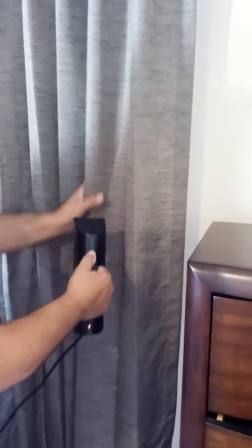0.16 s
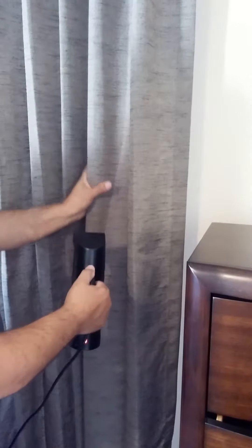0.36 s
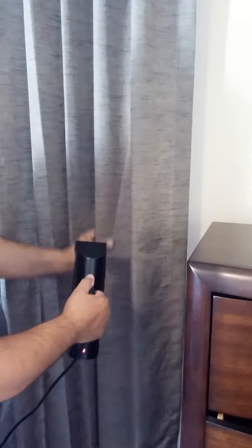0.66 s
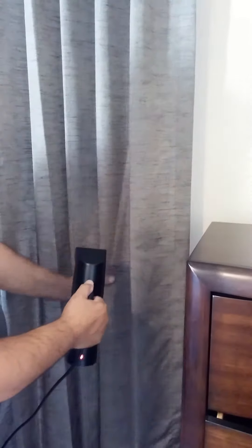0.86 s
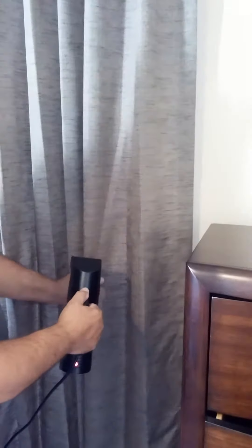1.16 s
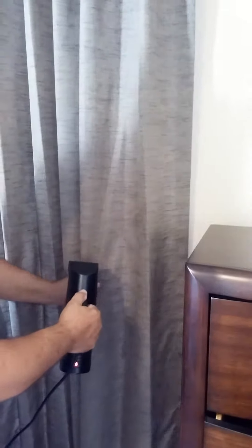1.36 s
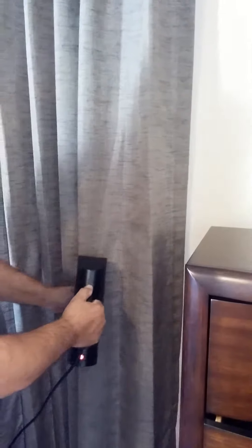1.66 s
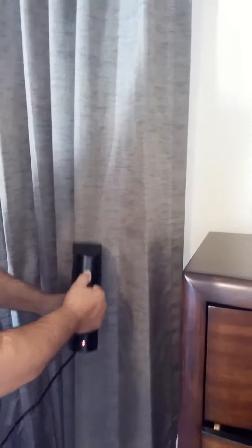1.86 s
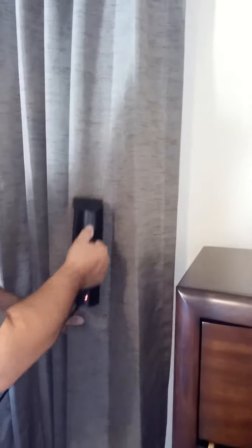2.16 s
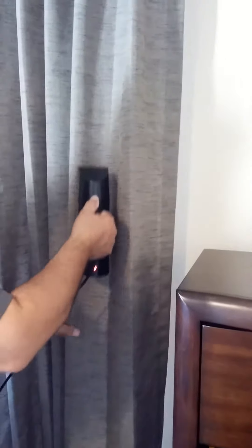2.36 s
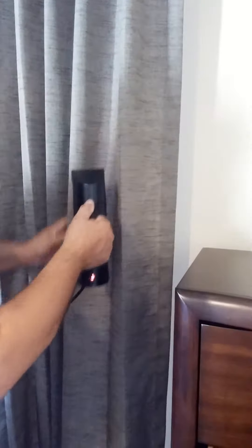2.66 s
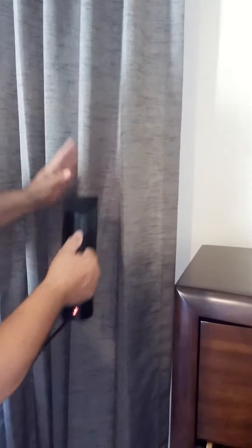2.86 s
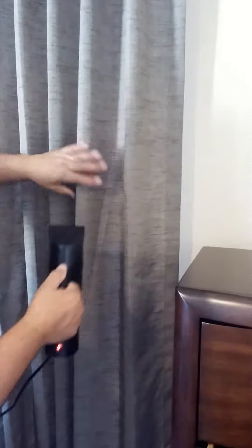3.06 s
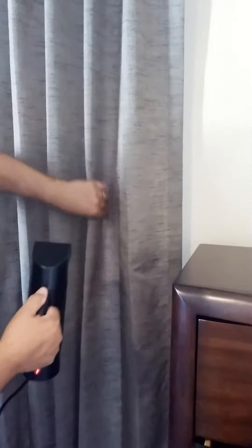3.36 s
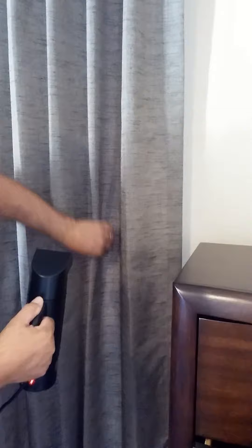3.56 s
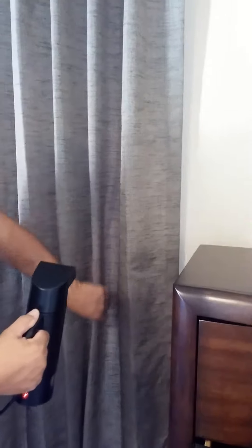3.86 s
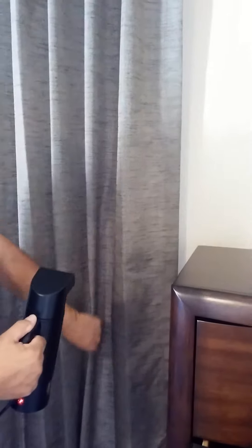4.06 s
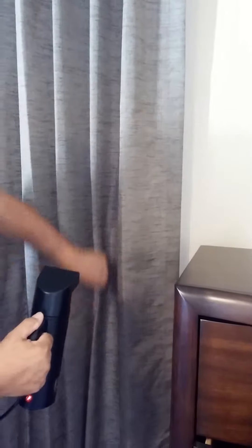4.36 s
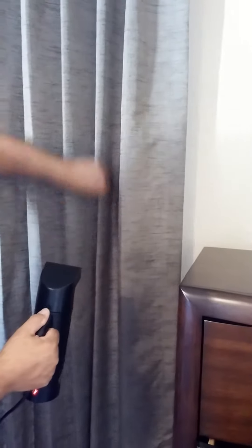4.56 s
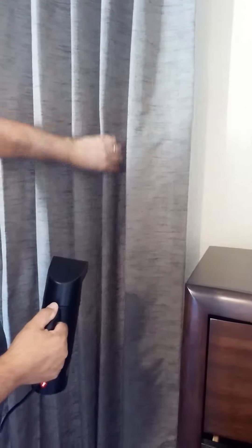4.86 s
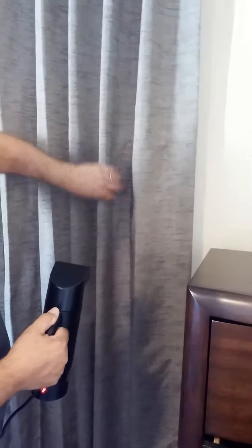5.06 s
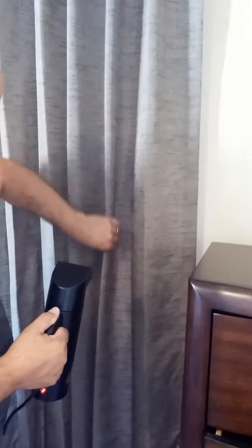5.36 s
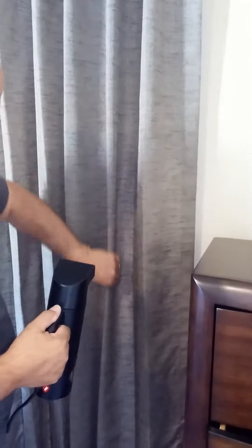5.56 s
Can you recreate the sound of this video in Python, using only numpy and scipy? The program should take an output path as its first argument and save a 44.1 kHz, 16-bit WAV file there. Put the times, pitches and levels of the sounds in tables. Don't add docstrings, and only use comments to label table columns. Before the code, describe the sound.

Uneven steam hiss spits and chokes with low watery glugs and small hollow knocks, fades to weak puffs, then surges back fuller.

```python
import sys
import numpy as np
from scipy import signal
from scipy.fft import rfft, irfft, next_fast_len
from scipy.io import wavfile
from scipy.ndimage import uniform_filter1d

SR = 44100
rng = np.random.default_rng(int(sys.argv[2]) if len(sys.argv) > 2 else 0)


def magnitude_from_level(level_db):
    exponent = np.asarray(level_db, float) / 20
    return 10 ** exponent


def master_out(mix):
    frames = np.transpose(np.atleast_2d(mix))
    ceiling = np.clip(frames, -1, 1)
    pcm = np.round(ceiling * 32767).astype(np.int16)
    wavfile.write(sys.argv[1], SR, pcm)


N = 251370

# (frequency [Hz], density [dB per Hz])
FLOOR_SPECTRUM = [(24, -16), (40, 2), (89, -28), (126, -25), (197, 10), (859, -74), (6160, -71),
                  (9410, -59), (15500, -30)]
# (frequency [Hz], correlation [-1..1])
PORT_LIKENESS = [(40, 0.94), (130, 1), (290, 0.73), (640, 0.49), (1410, 0.077), (3100, 0.2), (6800, 0.016),
                 (15000, 0.018)]
# (frequency [Hz], width [Hz], level [dB])
ROD_MODES = [(113, 15, 3), (239, 25.3, -3), (368, 25.4, -1), (449, 16, 1.5), (524, 20, -1),
             (701, 52.7, 5.5), (927, 25.3, 5)]
# (start [s], length [s], level [dB])
STROKES = [
    (.1, 1, -81.5),
    (3.42, 0.12, -66),
    (5.31, 0.305, -56.5),
]
# (frequency [Hz], density [dB per Hz])
RUMBLE_SPECTRUM = [(25, -19), (50, 11), (95, -5), (120, -0.5), (150, 6.5), (178, 4), (215, -6), (250, -1),
                   (320, -10.5), (450, -13), (600, -15), (900, -21.5), (1500, -41.5)]
# (start [s], length [s], rumble level [dB])
BOILS = [(.054, .1, -49), (.45, 0.2, -66), (.63, 0.061, -47), (.85, 0.026, -54.5), (.915, 0.15, -58.5),
         (1.13, 0.06, -58.5), (1.295, 0.056, -55), (1.49, 0.19, -63), (1.7, 0.085, -56), (1.96, 0.1, -58),
         (2.095, 0.14, -52), (2.27, 0.18, -58.5), (2.485, 0.077, -57.5), (2.6, 0.14, -55), (2.9, 0.07, -67),
         (3.05, 0.074, -54.5), (3.166, 0.029, -49), (3.305, 0.018, -56), (3.365, 0.044, -58.5),
         (3.47, 0.07, -55), (3.85, 0.064, -55), (3.93, 0.11, -49), (4.07, 0.14, -59.5), (4.335, 0.11, -58),
         (4.56, 0.081, -63), (4.65, 0.072, -52.5), (4.825, 0.082, -60), (5.06, 0.077, -53),
         (5.31, 0.069, -62), (5.485, 0.12, -52)]
# (time [s], peak [dB], frequency [Hz], length [s])
GLUGS = [(0.077, -40.5, 185, 0.024), (0.519, -57, 185, 0.037), (0.638, -47, 183, 0.03),
         (0.865, -44.5, 180, 0.02), (1.187, -47.5, 145, 0.019), (1.31, -40.5, 187, 0.027),
         (1.487, -50, 184, 0.024), (1.58, -52, 180, 0.028), (1.718, -50.5, 202.5, 0.043),
         (2.144, -46, 196, 0.043), (2.2, -53, 129, 0.027), (2.266, -51.5, 197, 0.02),
         (2.323, -47, 197, 0.02), (2.423, -52, 189, 0.027), (2.495, -45.5, 130, 0.022),
         (2.604, -42.5, 186.4, 0.025), (2.659, -43, 192, 0.017), (2.696, -38.5, 182, 0.021),
         (3.061, -39, 165.3, 0.029), (3.18, -42.5, 171.4, 0.031), (3.307, -47.5, 164, 0.017),
         (3.366, -51, 185, 0.018), (3.473, -45, 177, 0.033), (3.959, -43.5, 169, 0.027),
         (4.188, -49, 113, 0.039), (4.335, -50, 151, 0.026), (4.459, -50.5, 151.5, 0.042),
         (5.066, -42, 178, 0.031), (5.385, -51, 176, 0.042), (5.551, -45, 176.5, 0.025)]
# (time [s], peak [dB], frequency [Hz])
MORE_GLUGS = [(.667, -45, 186), (.693, -44, 179), (.95, -53, 120), (1.07, -59, 120), (.917, -55, 145),
              (1.131, -58, 159), (1.367, -51, 180), (1.974, -59, 186), (2.098, -55, 162), (2.361, -53, 113),
              (2.534, -48, 150), (2.94, -61, 131), (3.929, -59, 180), (4.009, -51, 150), (4.1, -43, 119),
              (4.602, -51, 175), (4.66, -55, 164), (4.828, -48, 178), (4.885, -52, 176), (5.136, -58, 172),
              (5.334, -58, 175), (5.516, -49, 174)]
# (time [s], peak [dB], frequency [Hz])
KNOCKS = [(0.291, -44, 1800), (0.471, -41.5, 1250), (0.528, -41.5, 1010), (0.683, -39, 680),
          (1.3, -50.5, 980), (1.477, -52, 1190), (2.154, -53, 790), (2.219, -68, 920), (2.348, -47.5, 980),
          (2.422, -39.5, 1200), (2.661, -49, 1224), (2.899, -44.5, 1250), (3.062, -39.5, 720),
          (3.181, -47, 717), (3.375, -40, 1000), (3.669, -39.5, 950), (3.83, -39.5, 1300),
          (4.27, -45.5, 975), (4.66, -39, 1250), (4.984, -39, 1020), (5.019, -41, 1030),
          (5.472, -36.5, 930), (5.518, -46, 830), (5.64, -41, 860), (5.687, -35, 1800)]
# (frequency [Hz], density [dB per Hz])
JET_SPECTRUM = [(250, -14), (500, -6), (1000, -2), (2000, 2), (3500, 1.5), (6000, -0.5), (9000, -4.5),
                (12000, 0), (14000, 3), (15800, 0.5)]
# (frequency [Hz], width [Hz], level [dB])
DUCT_MODES = [(715, 160, -0.5), (923.5, 117, 2), (1100, 81, 0.5), (1250, 80, -1), (1838, 180, -2.5),
              (576, 100, -35), (1680, 2200, -8)]
# (time [s], jet level [dB], duct ring over the jet [dB])
PRESSURE = [(0, -44.5, -6.5), (.3, -48.5, -10), (.96, -52.5, -4), (1.12, -58.5, -6), (1.5, -60, -5),
            (1.67, -52, -7), (1.9, -62, 2.5), (2.35, -65.5, -4), (2.42, -48, -15), (2.66, -72, -1),
            (2.91, -49.5, -5), (3.2, -58.5, -5.5), (3.36, -43.5, -6.5), (3.95, -43, -8), (4.2, -45, -4),
            (4.65, -39.5, -13), (5.05, -44, -5), (5.7, -42, -7.5)]
# (clears at [s], creep [s], depth [dB], clearing [s])
SLUGS = [(.09, .15, 14, 0.05), (.27, 0.031, 4, 0.022), (.44, 0.12, 12.5, 0.012),
         (0.632, 0.084, 5.5, 0.0051), (.745, 0.054, 8, .04), (0.788, 0.044, 5.5, 0.0078),
         (.945, 0.11, -0.5, .006), (1.098, 0.075, 13.5, 0.027), (1.215, .06, 13, 0.02),
         (1.3, 0.055, 4, 0.012), (1.467, .15, 16.5, 0.019), (1.783, 0.12, 14.5, 0.0062),
         (1.866, 0.079, 18, 0.019), (2.012, 0.029, 4, .008), (2.126, 0.055, 14, 0.01),
         (2.214, 0.028, 17, 0.0057), (2.305, 0.085, -2, 0.0067), (2.656, 0.24, 13.5, 0.0078),
         (2.75, 0.045, -3, 0.028), (3.057, 0.13, 4.5, 0.011), (3.158, 0.073, 10.5, .005),
         (3.218, .04, 2.5, 0.0052), (3.41, 0.042, 3, .04), (4.12, 0.11, 4.5, 0.11),
         (4.268, 0.085, 7.5, 0.012), (4.308, 0.097, 11.5, 0.052), (4.835, 0.047, 9.5, 0.043),
         (5.165, 0.16, 5.5, 0.056), (5.32, 0.038, 4.5, 0.065)]
# (time [s], peak [dB], duct share [dB], fade [s])
SPURTS = [(.1406, -69, -13, 0.035), (0.282, -53, -15, 0.055), (0.3773, -45, -35, 0.0081),
          (.4485, -65, 1.5, 0.12), (0.637, -46.5, -10.5, 0.038), (.7905, -46.5, -38, 0.047),
          (0.9485, -45, -20, 0.016), (1.2458, -52, -10.5, 0.029), (1.475, -81, 8, 0.043),
          (1.7915, -57.5, -15, 0.031), (2.017, -68, 0.5, 0.046), (2.1286, -80, -13, 0.023),
          (2.217, -62, 4, 0.03), (2.309, -52.5, -4.5, 0.026), (2.396, -57, -8, 0.044),
          (2.661, -59.5, -11, .025), (2.776, -54, -14, 0.039), (3.0628, -58, 7, 0.032),
          (3.1634, -64, 1, 0.036), (3.222, -52, -19, 0.026), (3.3084, -49, -25, 0.021),
          (4.272, -81, 12, 0.035)]
# (frequency [Hz], sharpness [Q], level [dB])
PORTS = [(9464, 11.2, 4.5), (8500, 5.7, -2)]
# (frequency [Hz], gain [dB])
FAR_PORT_SHADE = [(60, -3.5), (200, -0.5), (400, 2), (700, -4.5), (1300, 1.5), (5000, 0.5), (9000, -2),
                  (15000, -9.5)]


def evened(x):
    return x / np.sqrt(np.mean(x ** 2) + 1e-20)


def read(points, hz):
    f, value = np.transpose(points)
    return np.interp(np.log(hz + 1), np.log(f + 1), value)


def add(mix, start_s, sound):
    part = mix[..., round(start_s * SR):][..., :len(sound)]
    part += sound[:part.shape[-1]]


def curve(table):
    s, *columns = np.transpose(table)
    t = np.arange(N) / SR
    return [np.interp(t, s, column) for column in columns]


def swells(rows, rest_db, rise_s, fade_db_per_s):
    t, gain = np.arange(N) / SR, magnitude_from_level(rest_db)
    for start_s, length_s, db in rows:
        rise = np.clip((t - start_s) / rise_s + .5, 0, 1)
        past_end_s = np.maximum(t - start_s - length_s, 0)
        gain = gain + rise * magnitude_from_level(db - fade_db_per_s * past_end_s)
    return gain


def slow(hz):
    return evened(signal.lfilter(*signal.butter(2, hz, fs=SR), rng.standard_normal(N)))


def density(points):
    return lambda hz: magnitude_from_level(read(points, hz))


def modes(table):
    return lambda hz: np.sqrt(sum(magnitude_from_level(2 * db) / (1 + (2 * (hz - f) / w) ** 2) ** 2 for f, w, db in table))


def noise(colour, patchy_db):
    frames, hz = N // 256 + 5, np.fft.rfftfreq(1024, 1 / SR)
    a, b, c, d, patches = rng.standard_normal((frames, 513, 5)).T
    patches = uniform_filter1d(patches, size=10, axis=0)
    patches = evened(uniform_filter1d(patches, size=8, axis=1))
    same = np.clip(read(PORT_LIKENESS, hz), -1, 1)[:, None]
    left, other = a + 1j * b, c + 1j * d
    right = same * left + np.sqrt(1 - same ** 2) * other
    z = np.array([left, right]) * colour(hz)[:, None] * magnitude_from_level(patchy_db * patches)
    return evened(signal.istft(z, nperseg=1024, noverlap=768)[1][:, :N])


def floor():
    return magnitude_from_level(-82.5) * noise(density(FLOOR_SPECTRUM), patchy_db=-3.5)


def room(x):
    t = np.arange(SR // 4) / SR
    signs = rng.choice([-1., 1.], (2, len(t)))
    sparse = rng.random((2, len(t))) < .05
    decay = magnitude_from_level(-60 * t / 0.17) * (t > .004)
    taps = signs * sparse * decay
    taps = signal.lfilter(*signal.butter(1, 3500, fs=SR), taps / np.linalg.norm(taps[0]))
    return signal.fftconvolve(x, taps, axes=1)[:, :N]


def rod():
    rings = np.zeros(N)
    for f, width_hz, db in ROD_MODES:
        level = magnitude_from_level(db + 3.0 * slow(width_hz))
        hz = f + .6 * width_hz * slow(2 * width_hz)
        rings += level * np.sin(2 * np.pi * np.cumsum(hz) / SR)
    return evened(rings) * swells(STROKES, rest_db=-83.5, rise_s=0.02, fade_db_per_s=300)


def rumble():
    lumps_db = np.clip(3.1 * slow(26), -5, 3)
    lumpy = noise(density(RUMBLE_SPECTRUM), patchy_db=3.0) * magnitude_from_level(-5.5 + lumps_db)
    return lumpy * swells(BOILS, rest_db=-68.5, rise_s=0.012, fade_db_per_s=318)


def glugs():
    shared_length_s, upper_ratio, upper_db = 0.024, 1.4, -10.5
    out = np.zeros(N)
    for s, db, hz, length_s in GLUGS + [(*row, shared_length_s) for row in MORE_GLUGS]:
        start, bend = rng.random(2)
        u = np.arange(round(3 * length_s * SR)) / SR / length_s
        turns = hz * length_s * u * (1 + 0.031 * (bend - .5) * u) + start
        upper = magnitude_from_level(upper_db) * np.exp(-u) * np.sin(2 * np.pi * upper_ratio * turns)
        tone = np.sin(2 * np.pi * turns) + upper
        swell = 3.62 * u * np.exp(-(1.53 * u) ** 1.3)
        add(out, s - .008, magnitude_from_level(db - 4.5) * tone * swell)
    return out


def knocks():
    out, t = np.zeros((2, N)), np.arange(3000) / SR
    burst = np.hanning(900) ** .5 * np.exp(-np.arange(900) / 400.0)
    splash = 1.07 * np.exp(-t / 0.00081) * np.sin(2 * np.pi * 1400 * t)
    for s, db, hz in KNOCKS:
        tone = np.exp(-t / 0.0045) * np.sin(2 * np.pi * hz * t)
        shared = rng.standard_normal(900)
        for side in out:
            blows = (shared + 0.93 * rng.standard_normal(900)) * burst
            ring = signal.fftconvolve(blows, tone + splash)
            add(side, s - .002, magnitude_from_level(db - 4) * ring / abs(ring).max())
    return out


def choke_db():
    settled = 0.43
    total = np.zeros(N)
    for s, creep_s, depth_db, clearing_s in SLUGS:
        dip = [(s - creep_s, 0), (s - settled * creep_s, -depth_db), (s, -depth_db), (s + clearing_s, 0)]
        total += curve(dip)[0]
    return total


def spurts():
    t, hiss, ring = np.arange(SR // 4) / SR, np.zeros(N), np.zeros(N)
    for s, db, share_db, fade_s in SPURTS:
        spurt = (1 - np.exp(-t / 0.00053)) * np.exp(-t / fade_s)
        add(hiss, s, magnitude_from_level(db - 7.5) * spurt)
        add(ring, s, magnitude_from_level(db + share_db - 1) * spurt)
    return hiss, ring


def jet():
    jet_db, duct_db = curve(PRESSURE)
    choked_db = jet_db + choke_db()
    hiss_spurts, ring_spurts = spurts()
    hiss_gain = magnitude_from_level(choked_db - 5.5) + hiss_spurts
    ring_gain = magnitude_from_level(choked_db + duct_db - 4.5) + ring_spurts
    broad = noise(density(JET_SPECTRUM), patchy_db=1.1)
    body = signal.filtfilt(*signal.butter(2, 5500, fs=SR), broad)
    brighter = (hiss_gain / magnitude_from_level(-53.0)) ** 0.065
    hiss = hiss_gain * (body / brighter + (broad - body) * brighter)
    ring = ring_gain * noise(modes(DUCT_MODES), patchy_db=2.5)
    flutter = magnitude_from_level(0.78 * slow(29) + 1.0 * slow(250))
    return flutter * (hiss + ring)


def scene():
    steam = jet() + knocks()
    boiler = rumble() + glugs()
    return steam + magnitude_from_level(-9) * room(steam) + boiler + rod() + floor()


def roll_off(x):
    return signal.sosfilt(signal.butter(12, 15830, fs=SR, output="sos"), x)


def record(dry):
    size = next_fast_len(N + 2048)
    hz = np.fft.rfftfreq(size, 1 / SR)
    ports = np.array([magnitude_from_level(db) / (1 - (hz / f) ** 2 + 1j * hz / f / q) for f, q, db in PORTS])
    ports *= (1j * hz / 42 / (1 + 1j * hz / 42)) ** 2
    ports[1] *= magnitude_from_level(read(FAR_PORT_SHADE, hz))
    mix = irfft(rfft(dry, size) * ports, size)[:, :N]
    return roll_off(mix)


dry = scene()
out = record(dry)
master_out(out)
```